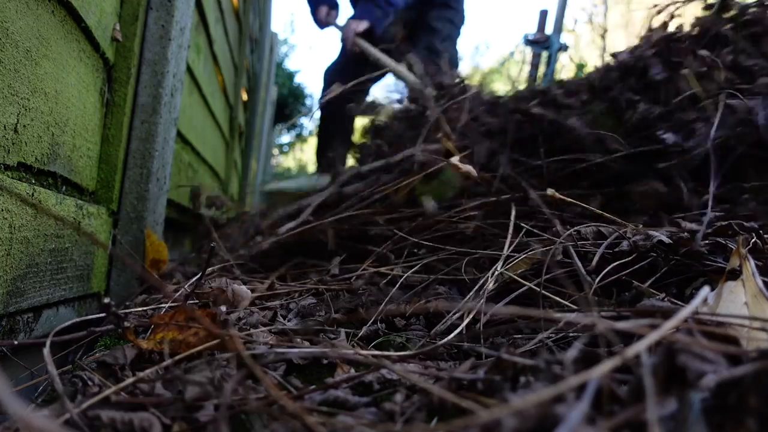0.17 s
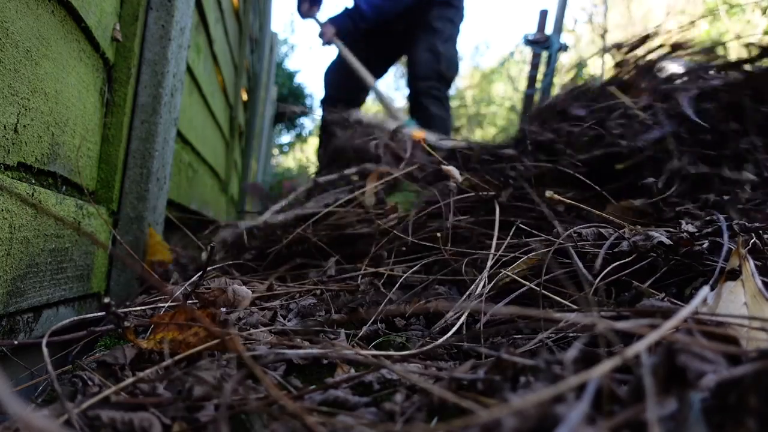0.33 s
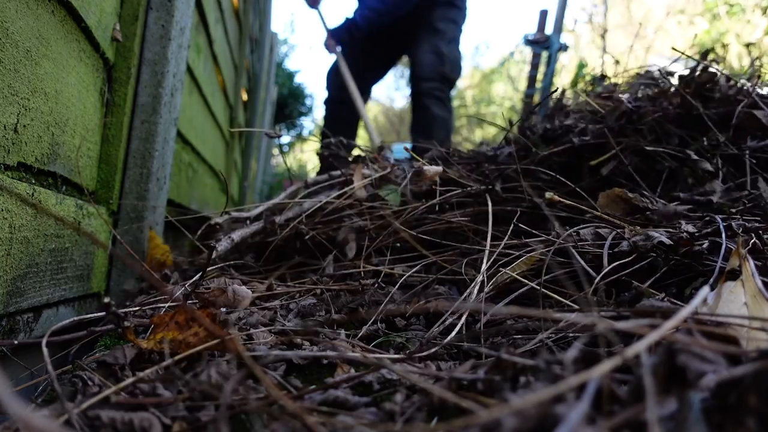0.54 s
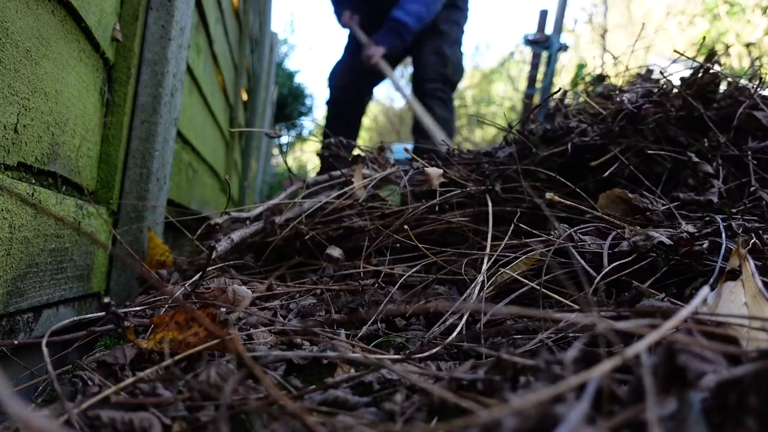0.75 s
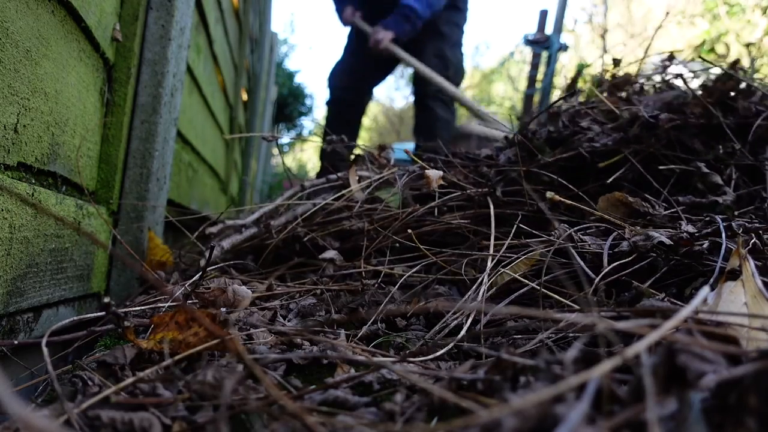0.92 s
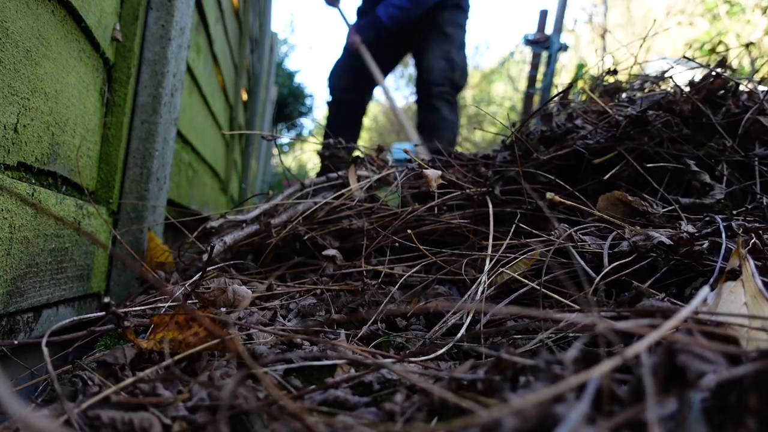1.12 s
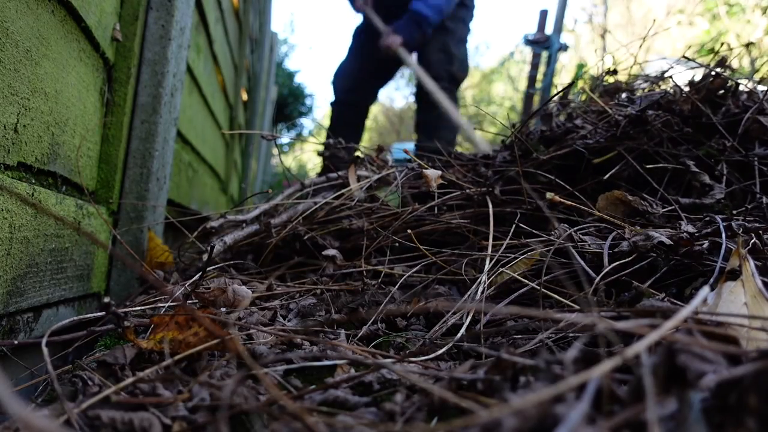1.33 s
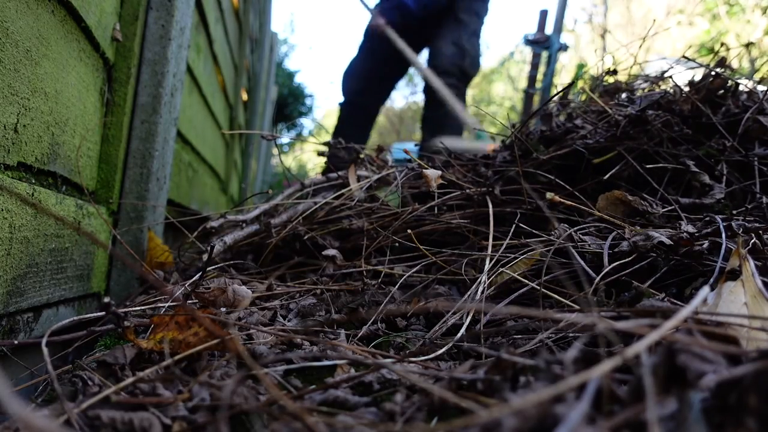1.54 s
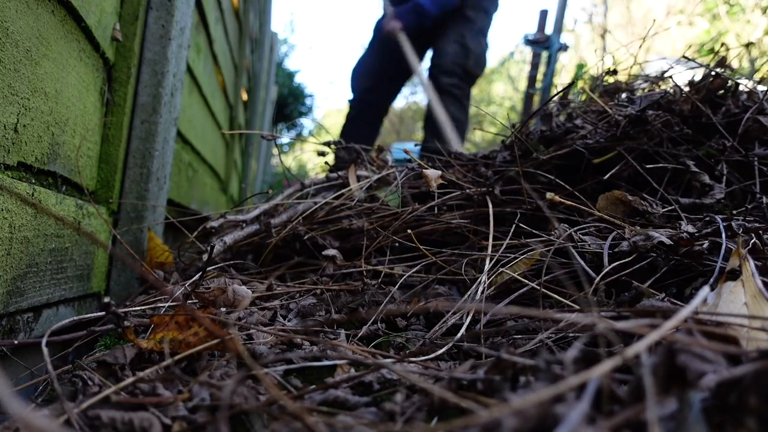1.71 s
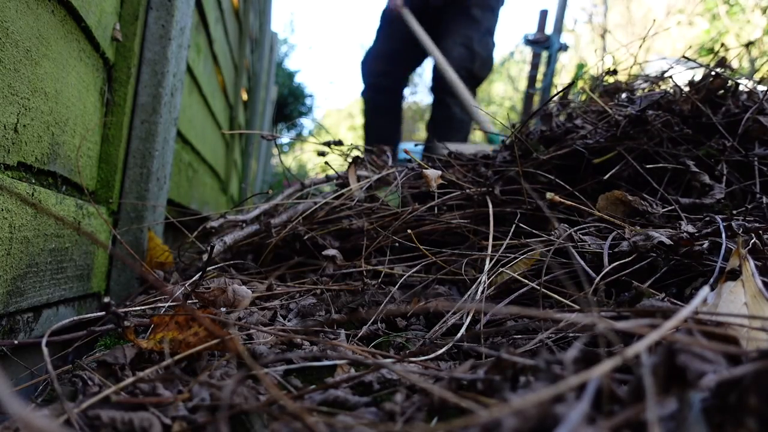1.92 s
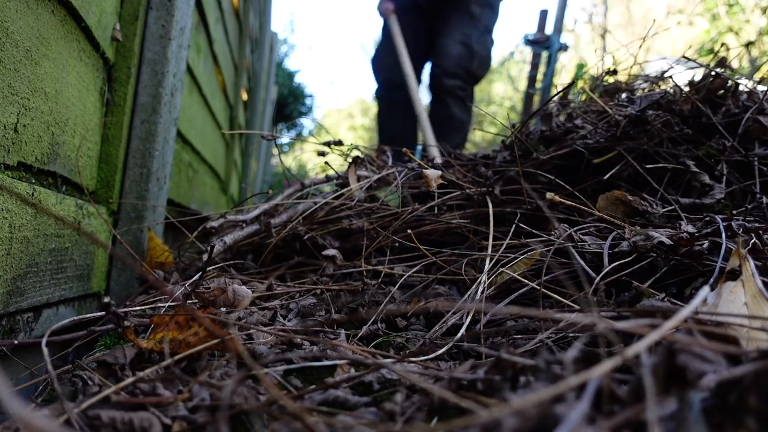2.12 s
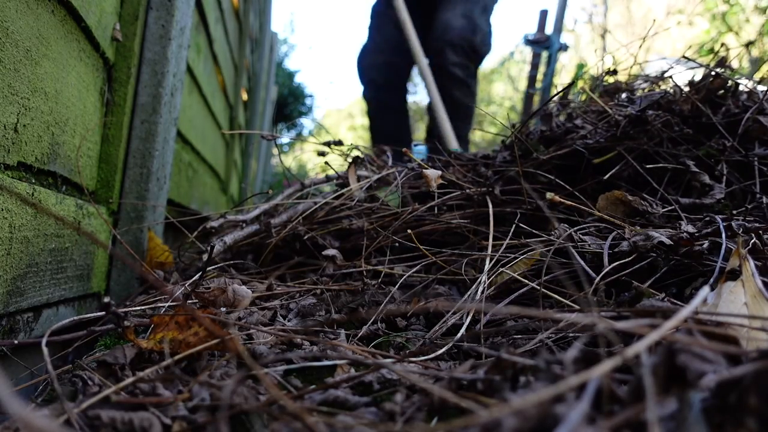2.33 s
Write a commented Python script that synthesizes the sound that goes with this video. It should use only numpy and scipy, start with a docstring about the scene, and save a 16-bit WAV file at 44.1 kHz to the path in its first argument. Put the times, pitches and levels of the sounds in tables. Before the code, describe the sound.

A rake scrapes through dry leaves and twigs in quick hissing strokes, knocking on the ground.

```python
"""A garden path, where a long-handled rake works behind a heap of dry leaves and twigs.
A pushed load slides and settles in a crackle of tiny fractures, and twigs snap. The head lands with
a ringing knock and scrapes forward in quick hissing strokes, gathering leaves and bumping over the
rough ground. A distant machine hums under the outdoor rumble."""
import sys
import numpy as np
from scipy import signal
from scipy.fft import rfft, irfft, next_fast_len
from scipy.io import wavfile

SR = 44100
rng = np.random.default_rng(int(sys.argv[2]) if len(sys.argv) > 2 else 0)


def dump(signal):
    """Clip the signal to [-1, 1] and save it as 16-bit WAV at the path in sys.argv[1]."""
    limited = np.clip(np.atleast_2d(signal).T, -1, 1)
    pcm = np.round(limited * 32767).astype(np.int16)
    wavfile.write(sys.argv[1], SR, pcm)


N = 108530
T = np.arange(N) / SR

# Rake strokes. Each row: start and end of full pressure, attack and release, all in seconds,
# level in dB, share of leaves gathered by the end from 0 to 1.
RAKE_STROKES = [(0.756, 0.863, 0.029, 0.053, -21, 0.98), (1.253, 1.253, 0.0032, 0.011, -25.5, 1),
                (1.362, 1.426, 0.021, 0.019, -19.5, 0.7), (1.829, 1.873, 0.022, 0.022, -22, 0.78),
                (2.219, 2.3, 0.0098, 0.02, -33, 0)]
# Scrape tone on the bare path, then packed with leaves. Each row: frequency in Hz, level in dB.
BARE_EQ = [(150, -5), (500, -1), (950, 9), (1600, 5), (2400, 2), (3600, 5.5), (6700, 5.5), (8500, 1),
           (11500, -1.5), (16000, -17.5)]
LOADED_EQ = [(150, -14), (450, -6), (950, 2), (1650, -1), (2500, 0), (4800, 7), (6500, 1), (9000, -8.5),
             (16000, -20)]
GATHER_SPAN = (0.28, 0.92)   # the load builds up over this part of a stroke

def strokes():
    """Each stroke starts bright on the bare path and turns to a fuller hiss as leaves gather."""
    bare_power, loaded_power = 0, 0
    for start, end, attack, release, db, gathered in RAKE_STROKES:
        early, late = np.maximum(start - T, 0) / attack, np.maximum(T - end, 0) / release
        power = from_db(db) ** 2 * np.exp(2 - 2 * np.hypot(1, early + late))
        load = gathered * np.interp((T - start) / (end - start), GATHER_SPAN, [0, 1])
        bare_power += power * (1 - load)
        loaded_power += power * load
    on_path = np.sqrt(bare_power) * coloured(grains(per_s=30000), BARE_EQ)
    in_leaves = np.sqrt(loaded_power) * from_db(1.5) * coloured(grains(per_s=30000), LOADED_EQ)
    return (on_path + in_leaves) * from_db(0.6 * drift(60))


# Envelope of the sliding heap. Each row: time in seconds, level in dB.
HEAP_ENVELOPE = [(0, -17.5), (.12, -20.5), (.18, -24), (.45, -23.5), (.54, -26.5), (.61, -31.5), (.70, -30),
                 (.96, -31.5), (1.08, -33), (1.23, -37.5), (1.49, -34), (1.60, -42), (1.72, -46),
                 (1.78, -32), (1.96, -35), (2.01, -36.5), (2.17, -44.5), (2.46, -48)]
# Tone of dry leaves. Each row: frequency in Hz, level in dB.
LEAF_EQ = [(200, -14.5), (600, -7), (1250, -3.5), (2350, -5), (3300, -0.5), (5000, 0.5), (7500, 0.5),
           (10000, -5), (13000, -13), (16000, -22.5)]
CRISP_HZ, CRISP_MAX_LOSS_DB = 6000, 13   # the treble above this pitch fades faster than the rest

def heap():
    """Dry leaves crackle against each other, sparser and duller as they come to rest."""
    db = np.interp(T, *np.transpose(HEAP_ENVELOPE))
    fade_db = db - db.max()
    density = from_db(0.7 * fade_db)
    rustle = coloured(grains(per_s=24000 * density) / np.sqrt(density), LEAF_EQ)
    body = butter(rustle, CRISP_HZ, "low")
    body = butter(body[:, ::-1], CRISP_HZ, "low")[:, ::-1]   # backwards too, to stay in phase
    crisp = (rustle - body) * from_db(np.maximum(0.47 * fade_db, -CRISP_MAX_LOSS_DB))
    return (body + crisp) * from_db(db + 0.67 * drift(20))


# The head hits the ground. Each row: start in seconds, then clack, thud and grit levels in dB.
LANDINGS = [(1.2469, -11.5, -27, -39), (1.7404, -7, -30, -26), (1.743, -31, -14, -17),
            (1.753, -33, -26, -45), (2.189, -6, -34, -21.5), (2.1912, -33, -13.5, -23.5),
            (2.1949, -22, -28, -35)]
# Modes of the head's clack, then of the thud. Each row: pitch in Hz, level in dB, T60 in seconds.
CLACK_MODES = [(570, -9, 0.016), (1107, -12, 0.029), (1247, -4, 0.02), (1546, -11.5, 0.024),
               (2740, -18, 0.02), (3655, -2, 0.022), (3940, -2, 0.019), (6100, -10, 0.021)]
THUD_MODES = [(120, -4, 0.045), (212, 1, 0.034)]
# Tone of grit crushed by the blow. Each row: frequency in Hz, level in dB.
GRIT_EQ = [(100, 1), (700, 2.5), (1300, 4), (2000, -1), (3400, 3), (6500, -3), (10000, -7), (16000, -28)]
CONTACT_S = 0.0024   # the tines meet the ground one after another over about this time

def knocks():
    """The head lands in up to three quick contacts, each a clack, a thud and crushed grit."""
    clack, thud, crush = 0, 0, 0
    for start, clack_db, thud_db, grit_db in LANDINGS:
        for hz, db, t60 in CLACK_MODES:
            clack += from_db(clack_db + db) * ring(start, hz, t60, CONTACT_S)
        for hz, db, t60 in THUD_MODES:
            thud += from_db(thud_db + db) * ring(start, hz, t60)
        crush += from_db(grit_db) * decay(start, t60=0.042)
    grit = crush * coloured(rng.standard_normal((2, N)), GRIT_EQ)
    return butter(clack, 270, "high") + butter(thud, 94, "high") + grit


# Bumps over rough ground. Each row: start in seconds, level in dB, pitch in Hz.
GROUND_BUMPS = [(0.775, -27, 234), (1.2565, -17, 960), (1.2665, -22, 1020), (1.301, -22.5, 944),
                (1.763, -23, 550), (1.7725, -20.5, 600), (1.913, -18, 460), (1.9245, -16.5, 338),
                (1.9285, -14, 470), (1.945, -19, 940), (1.9485, -17, 460), (1.968, -21, 816),
                (2.099, -25, 348), (2.109, -27.5, 610)]

def bumps():
    """The dragged head catches and drops with dull, gritty tocks."""
    tocks = sum(from_db(db) * ring(start, hz, t60=0.029) for start, db, hz in GROUND_BUMPS)
    grit_envelope = sum(from_db(db - 10) * decay(start, t60=0.057) for start, db, _ in GROUND_BUMPS)
    return butter(tocks + grit_envelope * noise_band(694, width=0.66), 160, "high")


# Breaking twigs. Each row: start in seconds, level in dB, pitch in Hz.
TWIG_SNAPS = [(0.1256, -16, 10000), (.1275, -21, 5800), (.141, -11.5, 6800), (.62, -23.5, 1400),
              (.648, -22.5, 1090), (1.632, -40, 6960), (2.044, -28.5, 7200), (2.1946, -12, 3120)]

def snaps():
    """Single twigs break: a short burst of splintering rings at the twig's pitch."""
    return sum(from_db(db) * noise_band(hz, width=0.22, envelope=decay(start, t60=0.0088))
               for start, db, hz in TWIG_SNAPS)


# Tines on stone between strokes. Each row: peak time and length in seconds, level in dB, pitch in Hz.
TINE_SCRATCHES = [(1.935, 0.028, -27.5, 5870), (1.966, 0.03, -32, 6900), (2.061, 0.028, -41.5, 7260),
                  (2.065, 0.042, -39.5, 4500), (2.126, 0.035, -40.5, 3440), (2.414, .09, -48, 3130)]

def scratches():
    """Lightly dragged tines swell and fade in a narrow hiss."""
    return sum(from_db(db) * np.exp(-2 * ((T - peak) / length) ** 2) * noise_band(hz, width=0.28)
               for peak, length, db, hz in TINE_SCRATCHES)


# Partials of the distant machine. Each row: pitch in Hz, level in dB.
HUM_PARTIALS = [(99, -44.5), (129.2, -42.5), (199, -48), (227, -51), (290, -50.5), (338, -51)]

def machine():
    """A far machine hums, each partial flickering in level and wavering in pitch."""
    hum = 0
    for hz, db in HUM_PARTIALS:
        level = from_db(db + 2 * drift(10.3))
        phase = 2 * np.pi * (hz * T + rng.random()) + 0.23 * drift(1.5)
        hum += level * np.sin(phase)
    return hum


# Tone of the open air. Each row: frequency in Hz, level in dB.
AIR_EQ = [(25, -18), (45, -3), (75, -7), (105, -7), (150, 0.5), (220, -1), (400, -8.5), (900, -8.5),
          (1800, -22.5), (5000, -30.5), (16000, -39)]

def rumble():
    """A steady bed of low outdoor noise."""
    return from_db(-43) * coloured(rng.standard_normal((2, N)), AIR_EQ)


# Stereo width. Each row: frequency in Hz, side level relative to mid in dB.
WIDTH_EQ = [(60, -46), (250, -25), (700, -17), (1500, -13), (3000, -14), (6000, -10.5), (11000, -7.5)]
# Stereo balance. Each row: frequency in Hz, left boost and matching right cut in dB.
PAN_EQ = [(200, 0), (550, -.35), (1100, -.8), (2200, -.3), (4500, -.9), (12000, .5)]

def coloured(pair, eq):
    """Shape two streams as mid and side: slightly right, wider towards the treble, rms 1."""
    size = next_fast_len(N)
    hz = np.arange(size // 2 + 1) * SR / size
    mid, side = rfft(pair, size) * gain_at(eq, hz)
    sign = np.array([[1], [-1]])   # left, right
    stereo = (mid + sign * side * gain_at(WIDTH_EQ, hz)) * gain_at(PAN_EQ, hz) ** sign
    return rms_one(irfft(stereo, size)[:, :N])


def grains(per_s, spread_db=2):
    """Two unrelated streams of tiny fractures, mostly small, a few large."""
    size = from_db(spread_db * np.minimum(rng.exponential(1, (2, N)), 5))
    return (rng.random((2, N)) < per_s / SR) * size * rng.choice([-1, 1], (2, N))


def noise_band(hz, width, envelope=1):
    """Enveloped noise through a band around a pitch; rms 1 where the envelope is 1."""
    noise, band = rng.standard_normal(N), [hz / (1 + width), hz * (1 + width)]
    return butter(noise * envelope + 1e-18, band, "band") / np.std(butter(noise, band, "band"))


def ring(start, hz, t60, rise=1e-9):
    """One struck mode, building up over the time of contact."""
    out, first = np.zeros(N), int(start * SR)
    t = T[:min(int(2 * t60 * SR), N - first)]
    envelope = from_db(-60 * t / t60) * (1 - np.exp(-t / rise))
    out[first:first + len(t)] = envelope * np.sin(2 * np.pi * hz * t)
    return out


def decay(start, t60):
    """An envelope that jumps to 1 and dies away."""
    return (T >= start) * from_db(-60 * np.clip((T - start) / t60, 0, 4))


def drift(hz):
    """Smooth random modulation with a spread of 1."""
    pole = np.exp(-80 * np.pi * hz / SR)
    noise = rng.standard_normal(N // 40 + 2002)
    slow = signal.lfilter([1], [1, -2 * pole, pole * pole], noise)[2000:]
    return np.interp(np.arange(N) / 40, np.arange(len(slow)), rms_one(slow))


def butter(x, hz, kind):
    """Second-order Butterworth filter."""
    return signal.sosfilt(signal.butter(2, np.clip(hz, 10, .45 * SR), kind, fs=SR, output="sos"), x)


def gain_at(eq, hz):
    """Gain of an EQ curve on a log-frequency axis."""
    points_hz, db = np.transpose(eq)
    return from_db(np.interp(np.log(hz + 1), np.log(points_hz), db))


def from_db(db):
    """Decibels to gain."""
    return 10 ** (np.asarray(db) / 20)


def rms_one(x):
    """Scale to unit rms."""
    return x / np.sqrt(np.mean(x ** 2) + 1e-20)


def scene():
    """The raking in open air, over the quiet background."""
    return strokes() + heap() + scratches() + snaps() + knocks() + bumps() + machine() + rumble()


def record(dry):
    """The microphone drops the lowest bass; the top is cut steeply."""
    high_cut = signal.ellip(12, .1, 80, 16000, fs=SR, output="sos")
    return signal.sosfilt(high_cut, butter(dry, 73, "high"))


dry = scene()
out = record(dry)
dump(out)
```